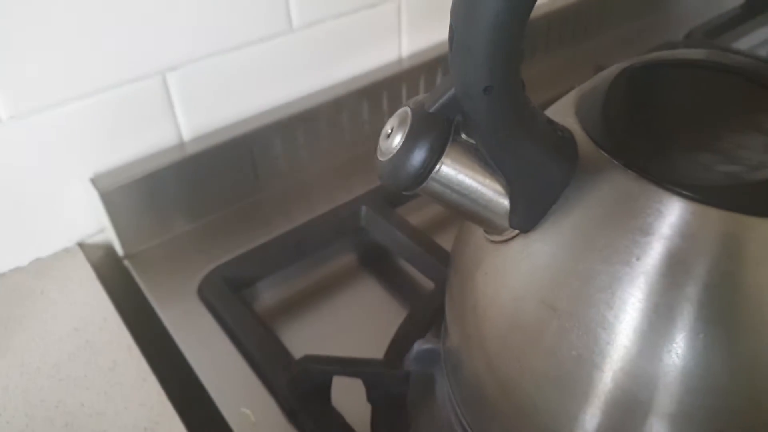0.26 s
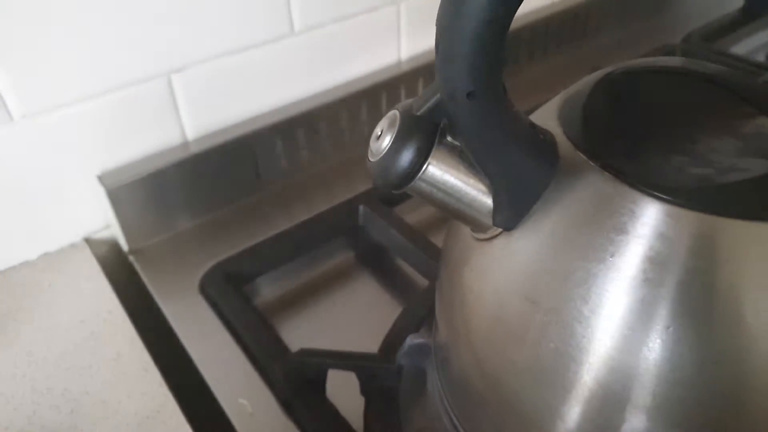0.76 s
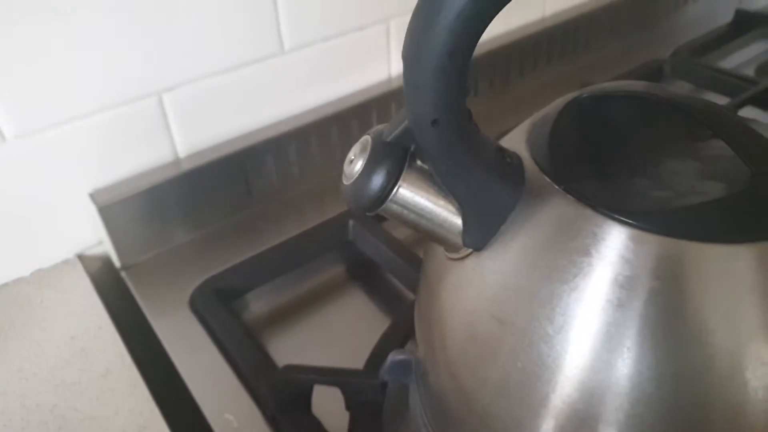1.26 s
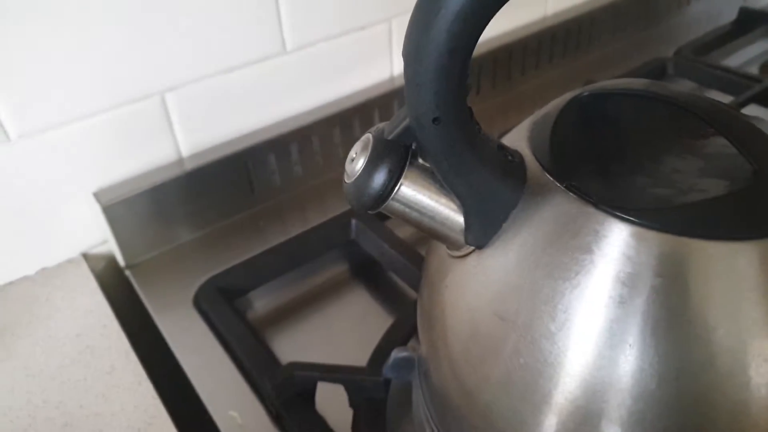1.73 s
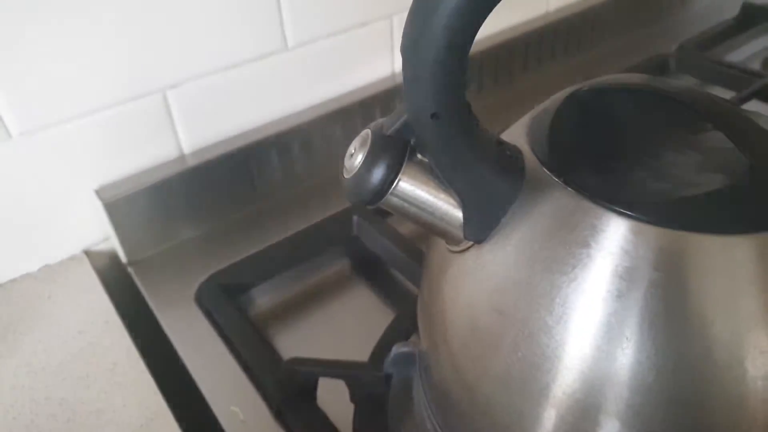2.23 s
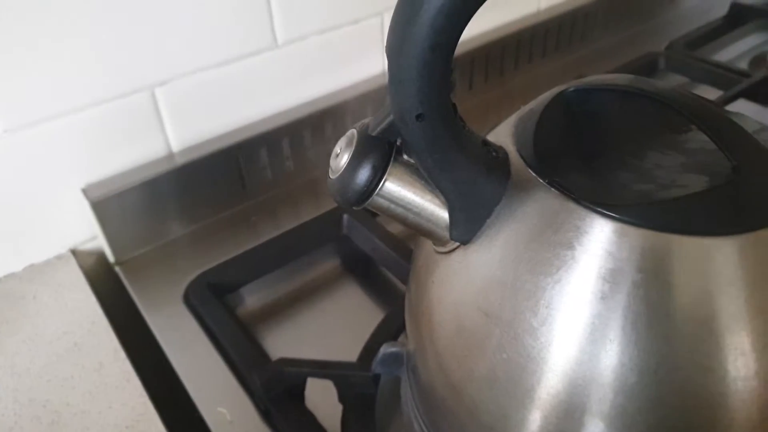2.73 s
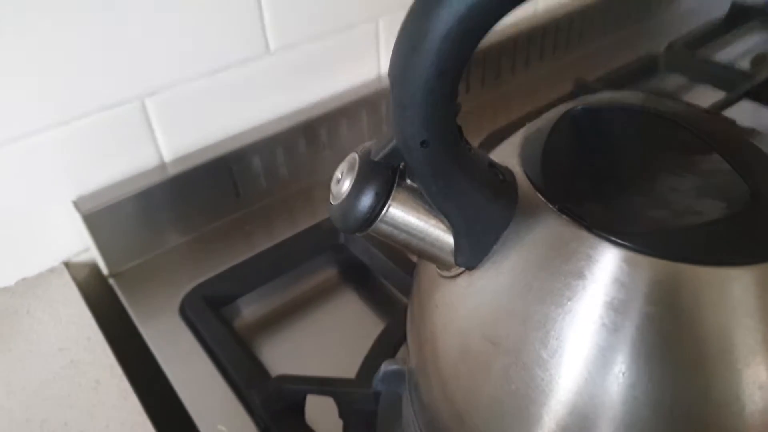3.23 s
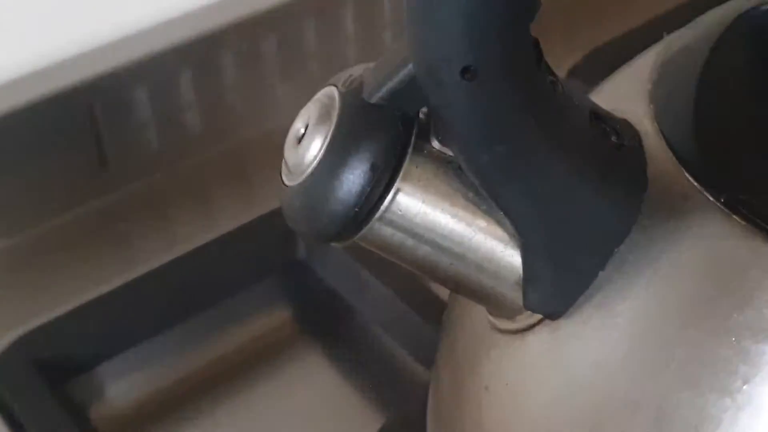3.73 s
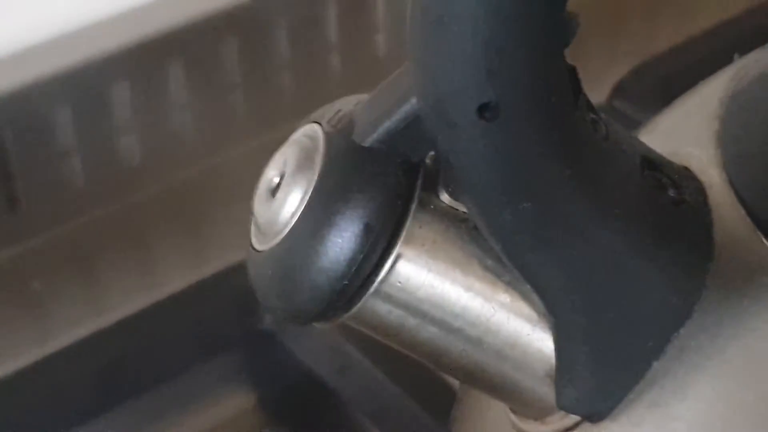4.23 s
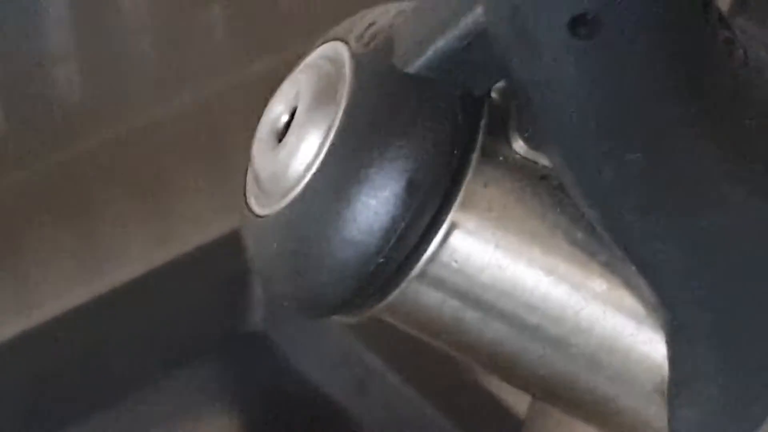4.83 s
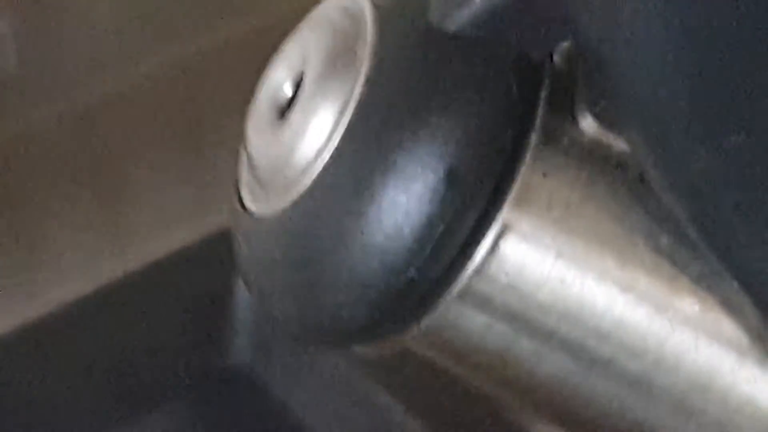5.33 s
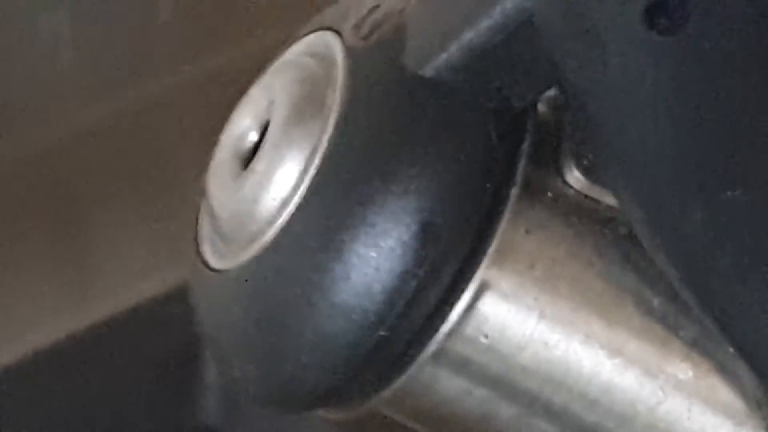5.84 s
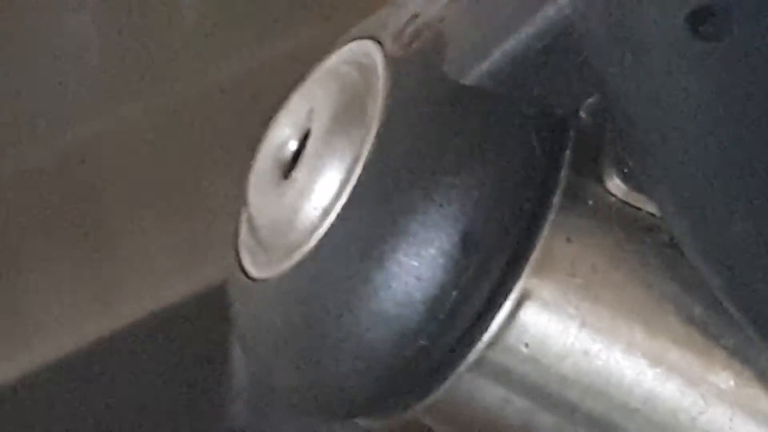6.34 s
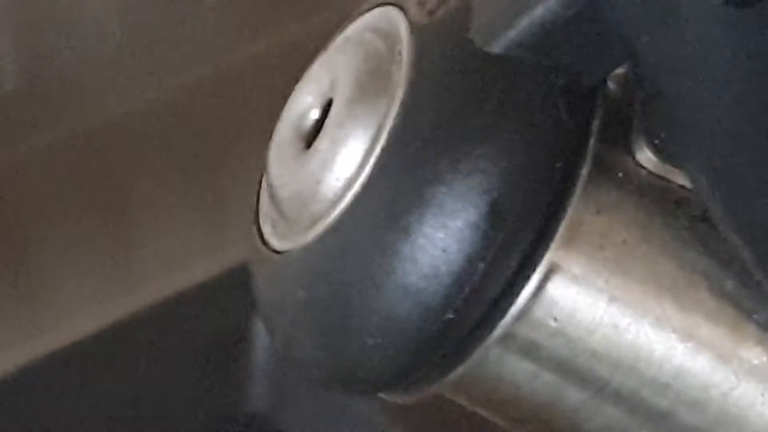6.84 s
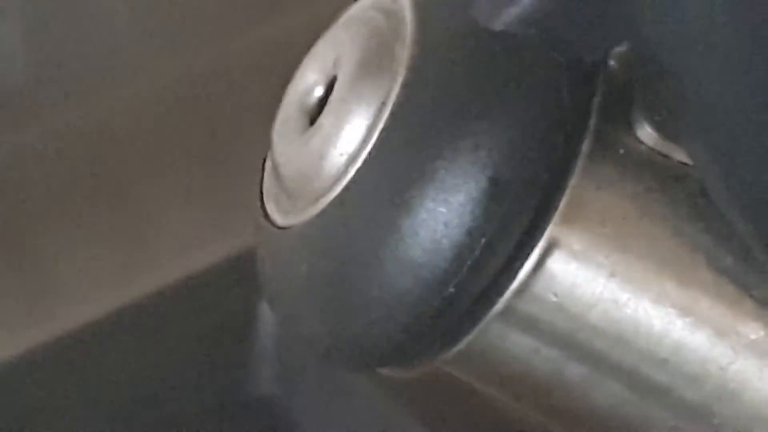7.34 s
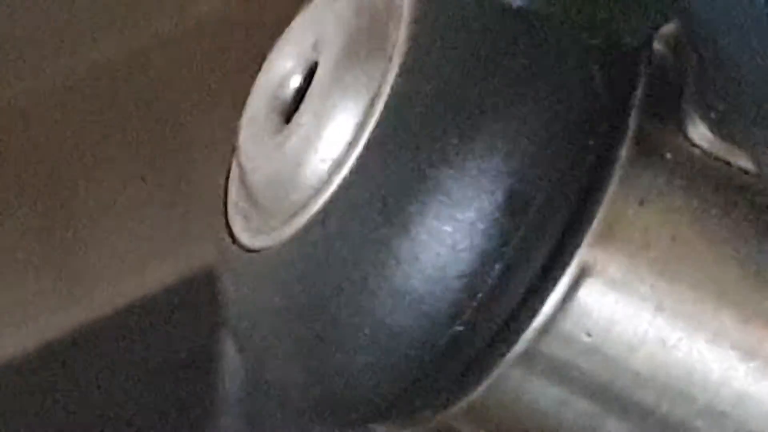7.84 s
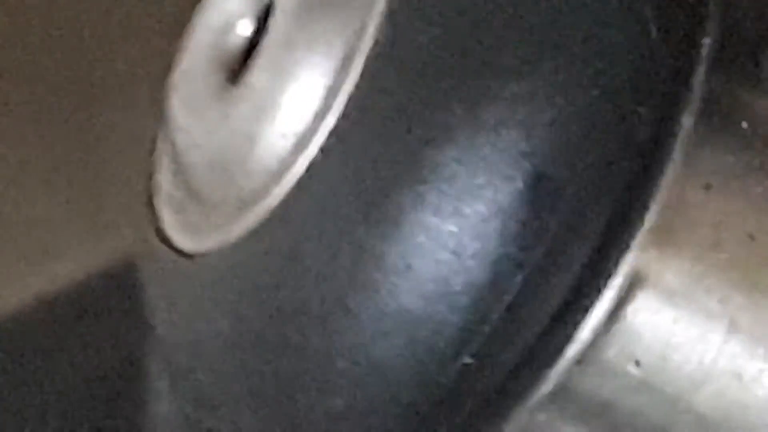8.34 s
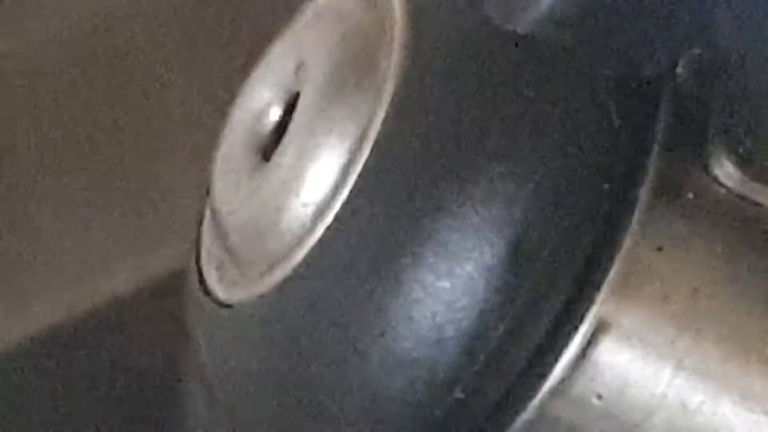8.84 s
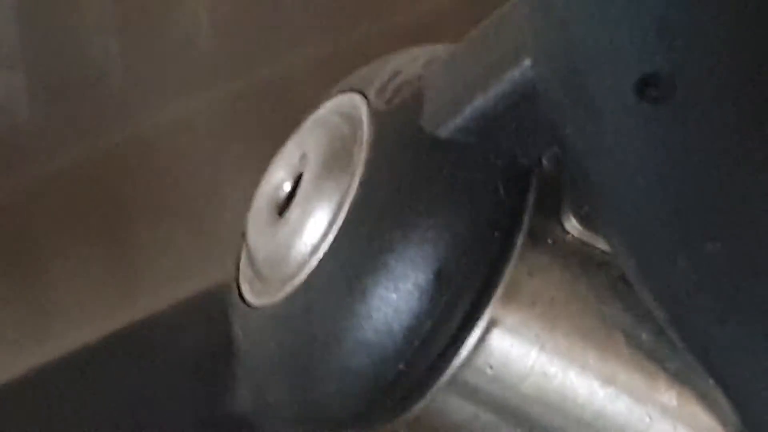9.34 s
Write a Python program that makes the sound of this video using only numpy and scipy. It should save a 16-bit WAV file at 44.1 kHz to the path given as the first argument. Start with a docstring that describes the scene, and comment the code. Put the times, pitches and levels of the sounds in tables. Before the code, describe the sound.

A metal kettle whistles on a gas stove, its shrill pitch fluttering rapidly over a rough hiss and a faint low rumble.

```python
"""A kettle whistles on a gas stove in a tiled kitchen, left of a two-port microphone.
Steam flutters in the spout cap about twenty times a second: each surge drives the whistle up and loud
and lets out a puff of hiss, then the pitch sags. Tiles and steel throw the sound back, while the
flame and the boiling water rumble below."""
import sys
import numpy as np
from scipy import signal
from scipy.fft import rfft, irfft, next_fast_len
from scipy.io import wavfile
from scipy.ndimage import uniform_filter1d

SR = 44100
rng = np.random.default_rng(int(sys.argv[2]) if len(sys.argv) > 2 else 0)


def inscribe(sig):
    """Save sig as 16-bit PCM at rate SR to the path in sys.argv[1].

    A 1-D sig is mono; a 2-D sig holds one channel per row.
    Samples are clipped to [-1, 1] before scaling.
    """
    pcm = np.round(np.clip(np.atleast_2d(sig).T, -1, 1) * 32767)
    wavfile.write(sys.argv[1], SR, pcm.astype(np.int16))


N = 422478
USUAL_DB = -10.5  # strength of an ordinary surge of steam


def gain_of(db):
    """Turns decibels into a factor to multiply by."""
    return 10 ** (np.asarray(db) / 20)


def evened(x):
    """Scales a signal to an average size (rms) of 1."""
    return x / np.sqrt(np.mean(x ** 2) + 1e-20)


def read(points, hz):
    """Looks up a table between its frequencies, on a musical (log) scale."""
    f, value = np.transpose(points)
    return np.interp(np.log(hz + 1), np.log(f + 1), value)


def resonate(x, hz, width):
    """A resonance: passes the sound near one pitch and weakens the rest."""
    return signal.lfilter(*signal.iirpeak(hz, hz / width, SR), x)


def wobble(span_s):
    """A smooth random curve that changes over about span_s."""
    size = max(int(span_s * SR), 1)
    return evened(uniform_filter1d(uniform_filter1d(rng.standard_normal(N), size), size))


def stereo_noise(spectrum, likeness, lean):
    """Shaped noise, partly alike on the left and right, and louder on one side."""
    size = next_fast_len(N)
    hz = np.fft.rfftfreq(size, 1 / SR)
    left, other = rfft(rng.standard_normal((2, size)))
    same = np.clip(read(likeness, hz), -1, 1)
    right = (same * left + np.sqrt(1 - same ** 2) * other) / gain_of(read(lean, hz))
    return evened(irfft(np.array([left, right]) * gain_of(read(spectrum, hz)), size)[:, :N])


def burner(drift_db):
    """The low roar of flame and boiling water, with the flame's one hollow note."""
    # tone colour of the roar: f/Hz, level/dB
    spectrum = [(15, -54), (25, -40), (48, -13.5), (80, -10.5), (99, -19), (114, 1), (147, -7.5),
                (247, -14), (297, -12.5), (334, -23), (438, -21), (751, -25.5), (967, -19), (1400, -26),
                (1820, -90), (3080, -120)]
    # how alike the two sides are: f/Hz, likeness (1 = the same)
    likeness = [(60, 1), (180, 0.96), (550, 0.68), (1650, -0.11), (4970, 0.23), (15000, -0.11)]
    # where the burner sits between the ports: f/Hz, left minus right/dB
    lean = [(60, 2.5), (150, 1.5), (380, 3), (950, -0.5), (2380, 4), (5980, 6.5), (15000, 7.0)]
    note_hz, width_hz = 113, 7.7
    ringing = resonate(rng.standard_normal(N), note_hz, width_hz)
    note = gain_of(-47.5) * evened(resonate(ringing, note_hz, 3 * width_hz))
    roar = gain_of(-45) * stereo_noise(spectrum, likeness, lean)
    return (roar + note * gain_of([[1.1], [-1.1]])) * gain_of(drift_db)


def room_tail():
    """Many tiny echoes with a quick bright start; each pitch range dies away at its own speed."""
    # how long the kitchen rings: f/Hz, time to fade by 60 dB/s
    ring_times = [(1500, 0.53), (4600, 0.72), (9000, 0.29), (14000, 0.13)]
    # treble scattered by the kettle's curved steel: f/Hz, level over the tail/dB
    glint = [(4500, 8), (6500, 17), (9000, 21.5), (14000, 21)]
    glint_fade_s, left_right_db = 0.044, (-14.5, -9)
    size, gap = SR // 3, 20  # in samples; one echo falls in each gap
    starts = np.arange(2 * gap, size - gap, gap)
    at = starts + rng.integers(0, gap, (2, len(starts)))
    echoes = np.zeros((2, size))
    np.put_along_axis(echoes, at, rng.choice([-1., 1.], at.shape), 1)
    hz, t, bands = signal.stft(echoes, SR, nperseg=128)
    slow = gain_of(-60 * t / read(ring_times, hz)[:, None])
    quick = gain_of(read(glint, hz)[:, None] - 60 * t / glint_fade_s)
    bright, plain = (signal.istft(bands * fade, SR, nperseg=128)[1] for fade in (slow + quick, slow))
    return bright * gain_of(left_right_db)[:, None] / np.linalg.norm(plain, axis=1, keepdims=True)


def kitchen(x):
    """The direct sound, a few strong echoes and a soft echo tail whose tone colour slowly sways."""
    # echoes off steel splashback, counter and tiles at the left port: delay/s, level/dB
    echoes_left = [(.001525, -18.5), (.00196, -10), (.00282, -41), (.004715, -14.5), (.00527, -29.5),
                   (.00577, -19.5), (.0085, -12.5), (.01226, -12), (.0150, -44)]
    # the same at the right port: delay/s, level/dB
    echoes_right = [(.00149, -8.5), (.00194, -31), (.0024, -10.5), (.0035, -4.5), (.00501, -24),
                    (.0076, -1), (.0092, -27)]
    sway_hz, echo_top_hz = 1.3, 6050  # higher sound is scattered into the tail by the curved steel
    sway = 2 * np.pi * sway_hz * np.arange(N) / SR
    wash = sum(signal.oaconvolve((x * share)[None], room_tail(), axes=1)[:, :N]
               for share in (np.sin(sway), np.cos(sway)))
    at, band = np.arange(1024), 2 * echo_top_hz / SR
    soft_click = lambda late: band * np.sinc(band * late) * np.exp(-(late / 14) ** 2)
    near = [sum(gain_of(db) * soft_click(at - s * SR) for s, db in port)
            for port in (echoes_left, echoes_right)]
    direct = at == 0
    return signal.oaconvolve(x[None], np.array(near) + direct, axes=1)[:, :N] + wash


def far_port(x):
    """The port facing away from the kettle hears it in another tone colour and a little late."""
    # tone colour of the far port: f/Hz, level/dB
    colour = [(500, -35), (2000, 2.5), (3200, -2), (4100, 0), (4600, 0.5), (5200, -5), (7500, -1),
              (9200, -4), (10500, -6.5), (13000, 2.5), (16000, -14)]
    hz = np.linspace(0, SR / 2, 257)
    shade = signal.firwin2(127, hz, gain_of(read(colour, hz)), fs=SR)
    return np.roll(signal.oaconvolve(x, shade, "same"), 4)


def surges():
    """The pushes of steam, each a little different: a higher crest is louder and sags deeper."""
    # the trend at every tenth surge: t/s, crest f/Hz, sag f/Hz, share of time spent falling, level/dB
    trend = [(-0.069, 4532, 2767, 0.79, -7.5), (0.453, 4567, 2520, 0.64, -9.5),
             (0.953, 4580, 2471, 0.62, -6.5), (1.432, 4568, 2950, 0.58, -10),
             (1.918, 4573, 2818, 0.59, -10), (2.391, 4594, 2726, 0.58, -7.5), (2.879, 4626, 2700, 0.57, -9),
             (3.356, 4590, 2600, 0.57, -11.0), (3.83, 4630, 2563, 0.57, -11.0),
             (4.318, 4606, 2670, 0.59, -10.5), (4.788, 4638, 2579, 0.59, -11.5),
             (5.27, 4646, 2564, 0.56, -9.5), (5.78, 4662, 2506, 0.61, -10),
             (6.257, 4628, 2615, 0.54, -11.0), (6.734, 4590, 2651, 0.54, -9.5),
             (7.228, 4624, 2650, 0.56, -10), (7.732, 4613, 2700, 0.59, -11.5),
             (8.223, 4637, 2614, 0.51, -11.5), (8.718, 4638, 2624, 0.62, -11.0),
             (9.207, 4638, 2580, 0.54, -12.5), (9.705, 4614, 2667, 0.6, -13)]
    # the strongest surges: t/s, lift of the crest/Hz, extra level/dB
    strong = [(0.242, 25, -1.3), (0.349, 67, -1.8), (0.453, 50, -1.5), (1.915, 41, -1), (2.584, 4.5, -2),
              (2.682, 44, -2), (2.78, 33, -1.5), (2.877, 46, -2), (3.166, 11, 1), (3.592, 51, -0.8),
              (3.737, 30, -0.5), (4.172, 60, -0.5), (4.271, 5, 1), (4.413, 38, -0.8), (4.648, 28, -1.5),
              (4.693, 30, -1.3), (4.743, 10.6, 1), (4.79, 5.8, 1.5), (5.03, 28.6, 0), (5.078, 52, -1.7),
              (5.473, 31, 0.1), (5.577, 30.4, 0.1), (5.63, 50, 0.7), (5.829, 40, 0.1), (6.21, 48, -0.7),
              (6.4, 70, -0.7), (6.982, 32, -0.5), (7.131, 59, 0.1), (7.18, 20, 0.5), (7.23, 5, 0),
              (7.281, 44, -0.5), (7.833, 59, -1), (8.029, 51, -0.8), (8.272, 39, 0.5), (8.371, 24, 1.5),
              (8.524, 54, 1.7), (8.669, 44, -0.8), (8.814, 46, -1.5), (9.059, 38, -0.5), (9.109, 54, -0.2),
              (9.213, 44.5, 0.1), (9.355, 50, 0.1)]
    sag_per_lift, db_per_lift_hz = 2.2, 0.0579
    rows = np.arange(10 * (len(trend) - 1) + 1) / 10
    s, crest_hz, sag_hz, falling, db = (np.interp(rows, np.arange(len(trend)), column)
                                        for column in np.transpose(trend))
    late, lift, sag, fall, level = rng.standard_normal((len(s), 5)).T  # ordinary surges vary by chance
    s = s + 0.000843 * late
    lift_hz = np.minimum(-12 + 22 * lift, 25.1)
    extra_db = 0.18 * level
    strong_s, strong_hz, strong_db = np.transpose(strong)
    nearest = abs(s[:, None] - strong_s).argmin(axis=0)
    s[nearest], lift_hz[nearest], extra_db[nearest] = strong_s, strong_hz, strong_db
    return (s, crest_hz + lift_hz, sag_hz - sag_per_lift * lift_hz + 70 * sag,
            falling + 0.0397 * fall, db + db_per_lift_hz * lift_hz + extra_db)


def flutter():
    """Steam flutters in the cap: gives the place in each turn (0 crest, .5 sag), pitch and strength."""
    crest_s, crest_hz, sag_hz, falling, db = surges()
    t = np.arange(N) / SR
    sag_s = crest_s[:-1] + np.clip(falling[:-1], .1, .9) * np.diff(crest_s)
    ends_s = np.ravel([crest_s[:-1], sag_s], "F")  # crest, sag, crest, sag...
    ends_hz = np.ravel([crest_hz[:-1], sag_hz[:-1]], "F")
    ends = np.arange(len(ends_s))
    turns = np.interp(t, ends_s, ends / 2)
    half = np.floor(2 * turns)
    eased = half + (1 - np.cos(np.pi * (2 * turns - half))) / 2  # rounded crests and sags
    eased -= 0.0661 * np.sin(2 * np.pi * eased)  # the pitch lingers at both ends
    eased += .02 * np.sin(np.pi * eased)  # and a little longer in the sag
    return turns % 1, np.interp(eased, ends, ends_hz), np.interp(t, crest_s, db)


def steam_hiss(turn, surge_db, drift_db):
    """Swirling steam lets out a puff of hiss with each surge."""
    # hiss through one surge: share of the turn after the crest, level/dB
    puff = [(0, 3.5), (.15, -3), (.35, -8.5), (.55, -18.5), (.72, 3), (.8, 1.5), (.9, 11), (1, 8)]
    # tone colour of the hiss: f/Hz, level/dB
    spectrum = [(700, -32), (1450, -21.5), (1750, -13), (2500, -5), (4000, -8), (5500, 4), (7000, -1),
                (9300, -6.5), (11500, -10.5), (14000, -14), (16000, -16.5)]
    follows = 0.15  # the hiss follows the surge's strength only in part
    size = next_fast_len(N)
    colour = gain_of(read(spectrum, np.fft.rfftfreq(size, 1 / SR)))
    hiss = irfft(rfft(rng.standard_normal(size)) * colour, size)[:N]
    puff_db = np.interp(turn, *np.transpose(puff)) + follows * (surge_db - USUAL_DB)
    return gain_of(-35.5 + puff_db + drift_db + 2 * wobble(0.0025)) * evened(hiss)


def whistle(turn, hz, surge_db, sag_db):
    """An unsteady steam jet sings on an edge: a note, two overtones and a weak tone an octave down."""
    # strength at each pitch: f/Hz, note level/dB, first overtone level/dB, second overtone level/dB
    voicing = [(2000, -15, -49, -44), (2700, -27.5, -28.5, -41), (3247, -17, -34, -52),
               (3440, -18.5, -23, -58), (3856, -17, -21, -36), (4310, -5, -18, -31.5),
               (4501, -10, -24.5, -33), (4580, -1, -17, -25.5), (4700, -2, -25, -31)]
    # the spout's pipe resonances, the first rung by the tone an octave down: f/Hz, width/Hz, level/dB
    spout = [(1751, 180, -54.5), (2670, 78, 8.5), (2710, 165, 7), (3194, 360, 8), (4590, 37, 1),
             (5820, 106, 13)]
    (under_hz, under_width, under_db), *resonances = spout
    pull_hz = sum(.45 * (hz - f) * np.exp(-((hz - f) / (1.5 * width)) ** 2)
                  for f, width, _ in resonances[:3])
    hz = hz - pull_hz  # the low resonances pull the pitch towards them
    phase = 2 * np.pi * np.cumsum(hz + 22 * wobble(0.00145)) / SR
    sagging = (1 - np.cos(2 * np.pi * turn)) / 2
    level_db = (1 - sagging) * surge_db + sagging * (sag_db - 16.5 + 1.96 * wobble(0.011))
    level_db += 1.2 * np.sin(2 * np.pi * turn)  # the fall is louder than the rise
    pitches, *partials_db = np.transpose(voicing)
    tone = np.zeros(N)
    for k, db in enumerate(partials_db):
        held_back_db = 0.51 * k * (surge_db - USUAL_DB)  # overtones follow the surge less
        flicker_db = (1.77 + 0.44 * k) * wobble(0.0011)
        tone += gain_of(np.interp(hz, pitches, db) - held_back_db + flicker_db) * np.cos((k + 1) * phase)
    tone *= gain_of(level_db)
    under = resonate(resonate(np.cos(phase / 2), under_hz, under_width), under_hz, 180)
    undertone = gain_of(under_db + 5.1 * wobble(0.0084)) * evened(under)
    ringing = sum((gain_of(db) - 1) * resonate(tone, f, width) for f, width, db in resonances)
    return tone + undertone + ringing


def scene():
    """The spout heard directly and off the walls, over the burner."""
    # slow drift: t/s, level in the sags/dB, hiss level/dB, right side turned down/dB, burner level/dB
    drift = [(0.0, 5, 1, 7.5, 2), (1.2, 1, -3, 10.5, 0.5), (1.6, 2.5, -3, 8, -1), (3.001, -0.5, -3, 11, -1),
             (3.5, 0, -0.5, 9, -0.5), (5.3, 0, -1.5, 10.5, -0.5), (7.1, -0.5, -4, 10, -1),
             (8.2, 1, -1.5, 9, -1), (9.58, 0.5, -2.5, 8.5, -1)]
    s, *columns = np.transpose(drift)
    sag_db, hiss_db, pan_db, burner_db = (np.interp(np.arange(N) / SR, s, c) for c in columns)
    turn, hz, surge_db = flutter()
    kettle = whistle(turn, hz, surge_db, sag_db) + steam_hiss(turn, surge_db, hiss_db)
    left, right = kitchen(kettle)
    return np.array([left, far_port(right) / gain_of(pan_db)]) + burner(burner_db)


def record(dry):
    """Cuts away the very highest treble."""
    low_pass = signal.firwin(1023, cutoff=15830, window=("kaiser", 9), fs=SR)
    return signal.oaconvolve(dry, low_pass[None], "same")


dry = scene()
out = record(dry)
inscribe(out)
```